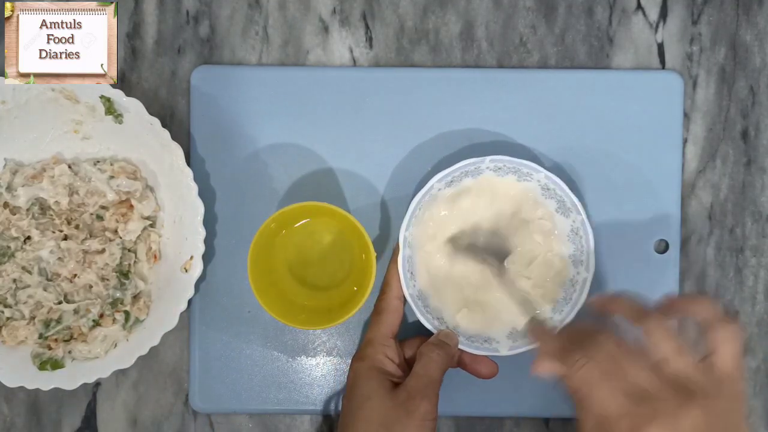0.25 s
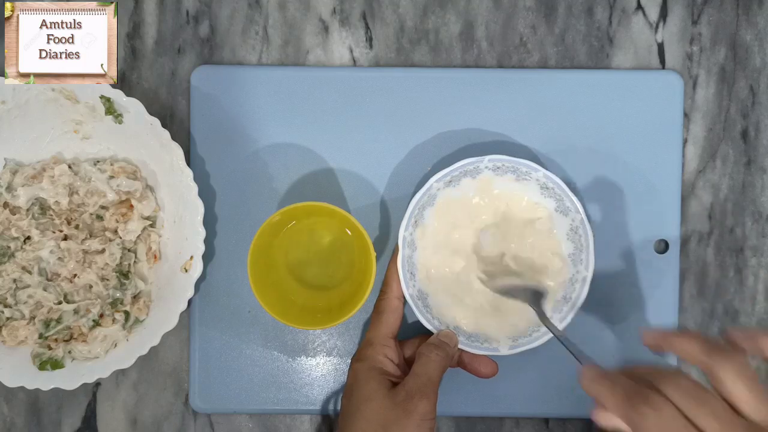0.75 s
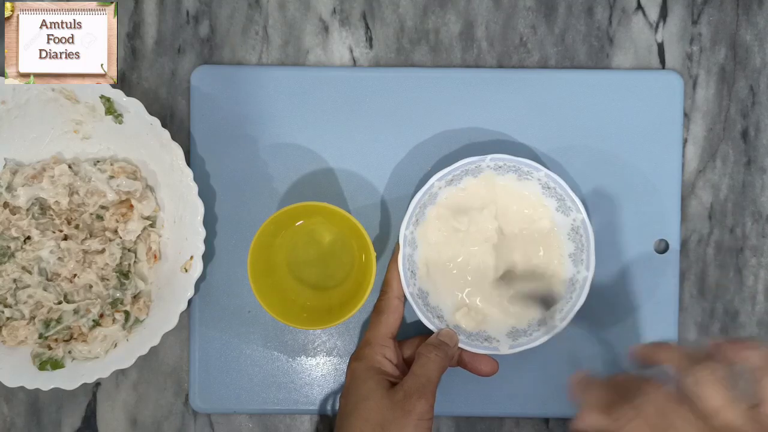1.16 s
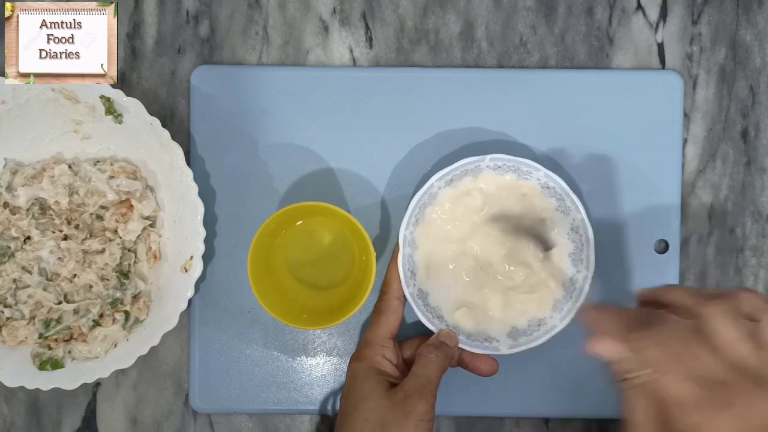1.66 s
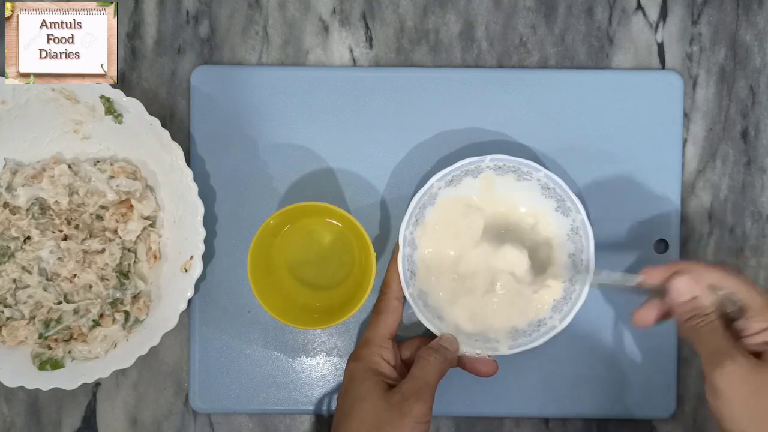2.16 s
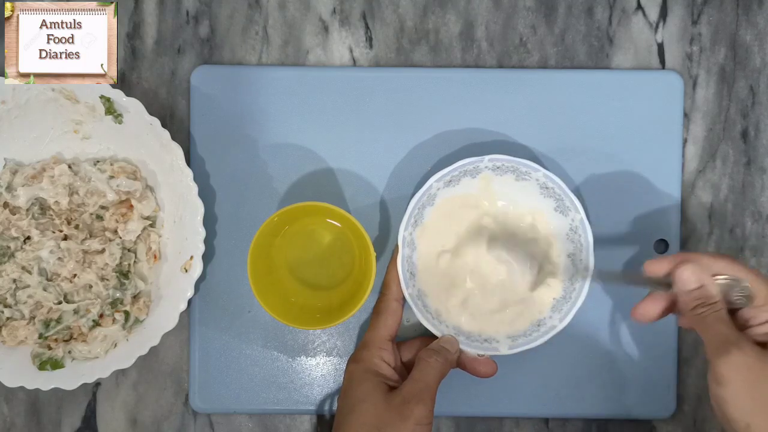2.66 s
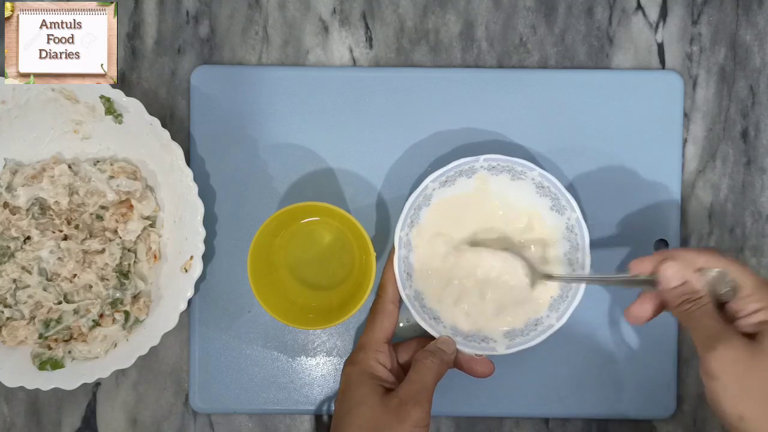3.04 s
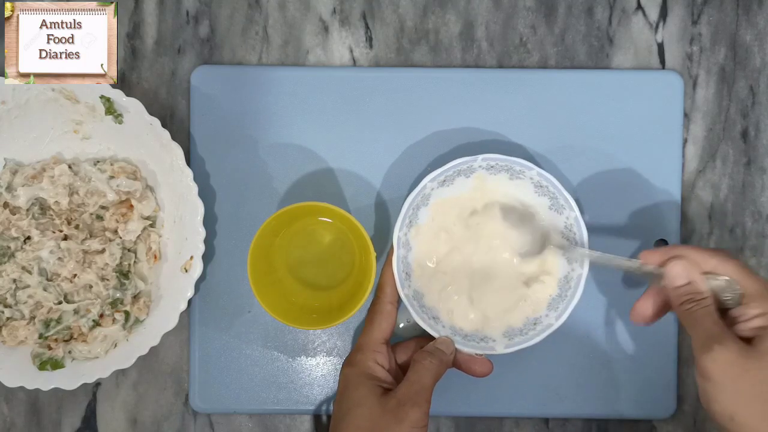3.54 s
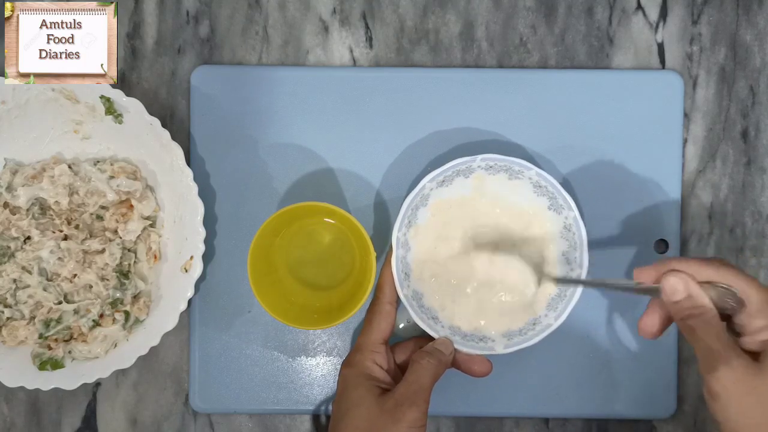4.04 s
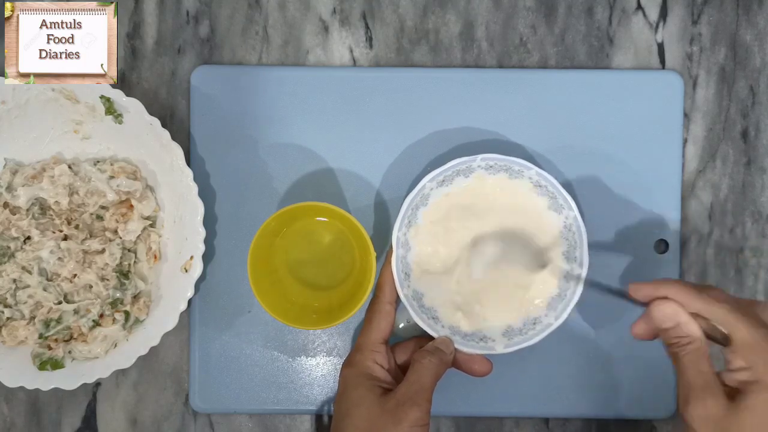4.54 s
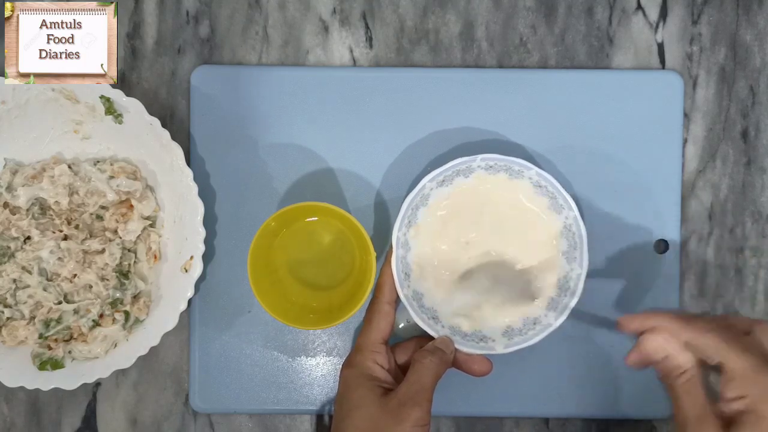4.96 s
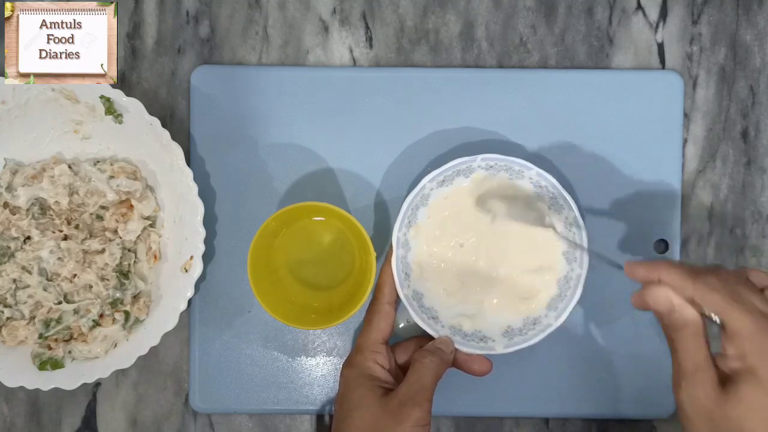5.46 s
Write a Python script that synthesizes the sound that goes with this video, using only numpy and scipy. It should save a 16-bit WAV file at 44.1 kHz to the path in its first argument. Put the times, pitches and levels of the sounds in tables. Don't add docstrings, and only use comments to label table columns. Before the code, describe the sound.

Close stereo phone pickup in a hard, tiled kitchen. A metal spoon stirs thick flour paste in a ceramic bowl, starting with faint taps and gritty scrapes, then irregular harder clacks dulled by the paste. The bowl rocks faintly on a plastic board. A distant horn sounds twice early on. Near the end, five bright rim clinks ring briefly, then one dull clack. A low fan hum continues throughout.

```python
import sys
import numpy as np
from scipy import signal
from scipy.fft import rfft, irfft
from scipy.io import wavfile
from scipy.ndimage import uniform_filter1d

SR = 44100
rng = np.random.default_rng(int(sys.argv[2]) if len(sys.argv) > 2 else 0)


def voltage_ratio(level):
    return 10 ** (np.asarray(level, float) / 20)


def store_wav(level_fs):
    pcm = np.round(np.clip(np.atleast_2d(level_fs), -1, 1) * 32767)
    wavfile.write(sys.argv[1], SR, pcm.T.astype(np.int16))


N = 250929

# time in seconds, peak level in dB,
# low clack in Hz, high clack in Hz, high clack level in dB.
STROKES = [(0.0541, -34, 1570, 2920, -10), (0.3566, -32.5, 1620, 2920, -10), (0.7235, -14, 2440, 4120, 0),
           (1.1229, -19.5, 1750, 3400, -2), (1.2775, -16.5, 1500, 3300, 3),
           (1.4429, -25.5, 1730, 2750, -8.5), (1.688, -21.5, 3020, 5300, -11),
           (2.296, -16.5, 1456, 3710, 2), (2.558, -25, 2440, 3140, -2), (2.749, -12, 2350, 3250, -17),
           (2.899, -20.5, 1780, 3400, -18.5), (2.9513, -8.5, 2610, 4260, -9.5),
           (3.1495, -10.5, 1880, 2710, -2.5), (3.302, -26.5, 2110, 4030, -35),
           (3.352, -22, 1840, 3930, -4.5), (3.508, -19.5, 2030, 3800, -15),
           (3.7071, -21, 2050, 3960, -12.5), (3.7543, -19.5, 4050, 2150, -8.5),
           (3.9183, -20, 2020, 3460, -15), (4.108, -13.5, 2060, 3970, -6), (4.1736, -19, 2300, 3800, -4),
           (4.688, -17, 1704, 2940, -6), (4.9047, -21, 2350, 4460, -6), (5.679, -12, 2830, 3110, 0.5)]
# time in seconds, peak level in dB, low clack in Hz, tick level in dB.
TAPS = [(0.148, -59, 1790, -22), (0.2942, -44.5, 2330, -38), (0.316, -44, 1630, -31),
        (0.515, -55, 1840, 15), (2.0034, -32, 2620, -18), (2.0434, -32.5, 1860, -40),
        (2.0802, -31.5, 2330, 15), (2.1845, -42.5, 2300, 23), (2.2802, -48, 2330, 10),
        (2.3502, -33, 1600, -22), (2.45, -36.5, 2050, 11), (2.681, -39, 1570, -3), (2.7008, -50, 1680, -25),
        (2.725, -48, 2080, -12), (2.9194, -38, 1790, 11), (3.101, -31, 1880, -45), (3.27, -28, 1910, 7),
        (3.3117, -33.5, 1770, 8), (3.475, -41, 2120, -1), (3.5557, -32.5, 1740, -20),
        (3.6838, -37, 1840, 31), (5.025, -34, 2470, 19), (5.0854, -15, 1600, -13),
        (5.5974, -43.5, 2790, 12)]
# time in seconds, peak level in dB.
RIM_CLACKS = [
    (4.377, -6),
    (4.6373, -6),
    (4.8636, -7),
    (5.0739, -9.5),
    (5.309, -8.5),
]
# time in seconds, strength in dB,
# then dB added to the middle, main and top mode families.
RINGS = [
    (0.7216, -41.5, 14, -8, -8),
    (4.377, -19, 3.5, 6.5, -3),
    (4.6367, -20, 0, -4.5, -14),
    (4.862, -19, -11, -15, -18),
    (4.906, -41, -11, -8, -18),
    (5.0737, -20, 5.5, 3.5, 2.5),
    (5.3094, -18, 0, 3, -2),
    (5.3841, -28, 4.5, 7.5, -5),
]
MODE_HZ = [1297, 1850, 2841, 2872, 3370, 4890, 4955, 7040, 7330, 7405, 7494, 7566, 8600, 10400, 10500,
           12680, 13730, 13850, 15250]
# level in dB, time to fade by 60 dB in seconds.
MODE_LEVEL_FADE = [(-4.5, 0.022), (0, 0.011), (-3, 0.06), (-3, 0.07), (2, .02), (8.5, 0.0091),
                   (-0.5, 0.076), (9, 0.012), (-9, 0.083), (-2.5, .06), (2, 0.11), (3, 0.064), (-6, .012),
                   (9, 0.022), (10, 0.031), (-4, 0.025), (4, 0.025), (4, .03), (-12, .03)]
MODE_FAMILY = [0, 0, 0, 0, 0, 0, 1, 0, 2, 2, 2, 2, 0, 3, 3, 3, 3, 3, 3]
# start in seconds, length in seconds, level in dB, wall resonance in Hz.
SCRAPES = [(-.05, 0.085, -58.5, 1650), (0.066, 0.14, -63, 1580), (0.28, .08, -54, 1700),
           (.82, 0.12, -72, 1870), (1.25, .12, -53.5, 1400), (1.46, 0.085, -55, 1780),
           (1.59, 0.1, -51, 1720), (1.695, 0.033, -61, 1840), (1.996, 0.16, -75, 1900),
           (2.34, 0.1, -70, 1700), (2.54, 0.082, -60, 2280), (2.685, 0.049, -72, 1860),
           (3.202, .1, -61, 2000), (3.58, 0.093, -78, 2000)]
# frequency in Hz, width in Hz, level in dB.
GLAZE = [(2330, 850, -0.5), (3620, 550, -9), (900, 170, -7)]
# time in seconds, peak level in dB, board note in Hz, thud level in dB.
KNOCKS = [(0.723, -40, 760, -52.5), (1.121, -39.5, 877, -52.5), (2.043, -39, 908, -47),
          (2.296, -42, 717, -56), (2.898, -41, 912, -57.5), (2.95, -40.5, 723, -49), (3.15, -48, 730, -50),
          (3.302, -37.5, 910, -64), (3.507, -45, 915, -61), (3.708, -41, 905, -59),
          (3.918, -25, 715, -53.5), (4.107, -42, 750, -49), (4.376, -42, 987, -54), (4.637, -40, 955, -44),
          (4.863, -36.5, 975, -45.5), (5.072, -58, 970, -46.5), (5.308, -54, 985, -49),
          (5.68, -50, 960, -42)]
# left delay in ms, right delay in ms, level in dB.
NEARBY = [(0.298, .14, -19), (1.152, 0.868, -20), (1.9, 1.9, 0.5)]
# frequency in Hz, left minus right in dB.
PORTS_DB = [(1000, -2), (2400, 2), (4400, -4.5), (8000, -2.5), (13000, -10.5)]
# frequency in Hz, level in dB.
SHEEN_DB = [(500, -3), (1500, 4), (4000, 0.12), (5800, -4.5), (7000, -1.5), (8500, -1), (9600, -10.5),
            (11800, -14.5), (14000, -6.5), (15400, -14), (16400, -40)]
# frequency in Hz, time to fade by 60 dB in seconds.
TILES_T60 = [(200, 0.66), (800, 0.41), (2500, 0.54), (6000, 0.5), (14000, 0.31)]
# frequency in Hz, level in dB.
TILES_DB = [(200, -4.5), (800, 7.5), (1600, -2), (2500, -3.5), (6000, -2), (14000, -3)]
# start in seconds, length in seconds, level in dB.
HONKS = [
    (.83, 0.3, -57.5),
    (1.179, 0.046, -56),
]
# frequency in Hz, width in Hz, level in dB.
HUM = [(50, 5.5, -78), (100.9, 28, -61), (125.7, 11.4, -62.5), (165.7, 27, -63.5), (254.7, 39, -64),
       (320.5, 41, -64.5), (380, 48, -67.5)]
# frequency in Hz, level in dB per Hz.
FLOOR = [(12, -45), (20, -6.5), (107, -5), (130, -1.5), (182, -4), (216, -17.5), (248, -12), (293, -22.5),
         (388, -13), (459, -15.5), (574, -16), (1090, -24), (6720, -38.5), (8890, -35.5), (16000, -40)]
# frequency in Hz, likeness from 0 to 1.
ALIKE = [(25, .7), (70, 1), (300, 0.83), (1000, 0.07), (3000, 0.13), (8000, 0)]

TICK_DB, TICK_AT_DB, TICK_PER_DB = -6, -12.5, 0.5
TICK_PER_HIGH_DB, LEAST_TICK_DB = 0.74, -25
TAP_HIGH_HZ, TAP_HIGH_DB, TAP_HIGH_PER_TICK = 3590, 1.5, 0.58
RIM_LOW_HZ, RIM_HIGH_HZ, RIM_HIGH_DB, RIM_TICK_DB = 2912, 7065, -6, -13.5
SPLASH_DB = -1
CUPPED_DB = -6
BOARD_T60_S = 0.076
SCRAPE_ATTACK_S, SCRAPE_FADE_DB_PER_S, WET_HISS_DB = 0.028, 200, -18
SLIPS_PER_S, GRIT_DB, JUDDER_DB = 1800, 3, 3.5
SHADE_DB, SHADE_PER_S = 2.5, 70
HORN_HZ, HORN_SAG_HZ_PER_S, HORN_EDGE_S = 411, 62, 0.051
MAINS_HZ, MAINS_DB, FLOOR_DB = 100.9, -57, -53


def along(table, hz):
    f, v = np.transpose(table)
    return np.interp(np.log(hz + 1), np.log(f + 1), v)


def shape(x, gain):
    n = x.shape[-1]
    return irfft(rfft(x) * gain(np.arange(n // 2 + 1) * SR / n), n)


def unit(x):
    return x / np.sqrt(np.mean(x ** 2))


def peak(x, hz, width_hz):
    return signal.lfilter(*signal.iirpeak(hz, hz / width_hz, fs=SR), x)


def glide(x, hz, width_hz):
    turn = np.exp(2j * np.pi * np.cumsum(hz) / SR)
    keep = np.exp(-np.pi * width_hz / SR)
    return 2 * np.real(signal.lfilter([1 - keep], [1, -keep], x / turn) * turn)


def mode(hz, t60, length_s, rise_s=0.00031, turn=0):
    t = np.arange(int(length_s * SR)) / SR
    return np.sin(2 * np.pi * (hz * t + turn)) * 10 ** (-3 * t / t60) * (1 - np.exp(-t / rise_s))


def add(out, s, x):
    i = int(s * SR)
    out[..., i:i + x.shape[-1]] += x[..., :N - i]


def walk(rate):
    k = int(SR / rate)
    held = np.repeat(rng.standard_normal(N // k + 1), k)
    return 1.11 * uniform_filter1d(uniform_filter1d(held, k), k)[:N]


def pair(n):
    mid, side = rng.standard_normal((2, n))
    like = lambda f: np.clip(along(ALIKE, f), 0, 1)
    mid = shape(mid, lambda f: np.sqrt(1 + like(f)))
    side = shape(side, lambda f: np.sqrt(1 - like(f)))
    return np.array([mid + side, mid - side]) / np.sqrt(2)


def all_blows():
    blows = []
    for s, db, low_hz, high_hz, high_db in STROKES:
        tick_db = TICK_DB + TICK_PER_DB * (db - TICK_AT_DB) + TICK_PER_HIGH_DB * (high_db + 10)
        blows.append((s, db, low_hz, high_hz, high_db, tick_db))
    for s, db, low_hz, tick_db in TAPS:
        blows.append((s, db, low_hz, TAP_HIGH_HZ, TAP_HIGH_DB + TAP_HIGH_PER_TICK * tick_db, tick_db))
    for s, db in RIM_CLACKS:
        blows.append((s, db, RIM_LOW_HZ, RIM_HIGH_HZ, RIM_HIGH_DB, RIM_TICK_DB))
    return blows


def clacks():
    out, n = np.zeros((2, N)), 1600
    t = np.arange(n) / SR
    pitched = voltage_ratio(np.array([[0], [CUPPED_DB]]))
    bright = signal.butter(2, 4500, "high", fs=SR, output="sos")
    for s, db, low_hz, high_hz, high_db, tick_db in all_blows():
        turn, wait = rng.random(2)
        g = rng.standard_normal((2, n))
        splash = peak(peak(g[0] * np.exp(-t / 0.0041), low_hz, 1920), low_hz, 2100)
        low = pitched * unit(mode(low_hz, 0.0093, n / SR, 0.00065)) + voltage_ratio(SPLASH_DB) * unit(splash)
        high_splash = unit(peak(g[1] * np.exp(-t / 0.0022), high_hz, 3000))
        high = pitched * unit(mode(high_hz, 0.009, n / SR, turn=turn)) + voltage_ratio(1.0) * high_splash
        tick_fade = np.exp(-t / 0.00055) + voltage_ratio(-29) * np.exp(-t / 0.005)
        tick = unit(signal.sosfilt(bright, g[0, ::-1] * tick_fade))
        body = unit(peak(g[1, ::-1] * np.exp(-t / 0.0052), 1090, 910))
        blow = low + voltage_ratio(high_db + 6) * high + voltage_ratio(-20) * body
        blow = blow + (voltage_ratio(tick_db + 8.5) + voltage_ratio(LEAST_TICK_DB)) * tick
        blow = voltage_ratio(db - 18.5) * unit(blow)
        add(out, s - 0.0002, blow)
        add(out, s + 0.002 + 0.001 * wait, voltage_ratio(-12.0) * blow)
    return out


def rings():
    families, thump = np.zeros((4, N)), np.zeros(N)
    for s, db, *family_db in RINGS:
        for hz, (mode_db, t60), family in zip(MODE_HZ, MODE_LEVEL_FADE, MODE_FAMILY):
            strength, shift, turn = rng.random(3)
            gain = voltage_ratio(db + [0, *family_db][family] + mode_db - 5.0 + 1.7 * (strength - 1.5))
            add(families[family], s, gain * mode(hz * (1 + (shift - 0.5) / 600), t60, 0.3, turn=turn))
        add(thump, s, voltage_ratio(db - 20) * mode(45, 0.073, 0.1, 0.003))
    return thump + sum(family * voltage_ratio(4.5 * walk(130)) for family in families)


def drag():
    t = np.arange(N) / SR
    press = 0
    for start, length, db, _ in SCRAPES:
        fade_db = SCRAPE_FADE_DB_PER_S * np.clip(t - start - length, 0, None)
        press = press + voltage_ratio(db - fade_db) * np.clip((t - start) / SCRAPE_ATTACK_S, 0, 1)
    grain_db = GRIT_DB * rng.exponential(size=N) + JUDDER_DB * walk(40.4)
    slips = (rng.random(N) < SLIPS_PER_S / SR) * rng.standard_normal(N) * voltage_ratio(grain_db)
    start, length, _, hz = np.transpose(SCRAPES)
    moving = glide(slips, np.interp(t, start + length / 2, hz), 260.0)
    steady = sum(voltage_ratio(db) * peak(slips, f, width) for f, width, db in GLAZE)
    wall = unit(voltage_ratio(5.5) * moving + steady)
    hiss = unit(peak(peak(rng.standard_normal(N), 9000, 9000), 11000, 9000)) * voltage_ratio(2.0 * walk(20))
    return voltage_ratio(-1.0) * press * (wall + voltage_ratio(WET_HISS_DB) * hiss)


def knocks():
    out = np.zeros(N)
    for s, db, hz, thud_db in KNOCKS:
        board = mode(hz, BOARD_T60_S, 0.2, 0.0047) + voltage_ratio(-12) * mode(hz * 1.2, BOARD_T60_S, 0.2, 0.002)
        thud = mode(255.2, 0.11, 0.2, 0.0044) + voltage_ratio(1.5) * mode(312.3, 0.072, 0.2, 0.0037)
        add(out, s, voltage_ratio(db - 2.5) * board)
        add(out, s, voltage_ratio(thud_db + 11.0) * thud)
    return out


def phone_ports(x):
    left_ms, right_ms, db = np.transpose(NEARBY)
    late = lambda f, ms: np.exp(-2j * np.pi * np.outer(f, ms) / 1000) @ voltage_ratio(db)
    treble = lambda f: 1j * f / (2500 + 1j * f)
    bounces = lambda f: 1 + treble(f) * np.array([late(f, left_ms), -late(f, right_ms)])
    return shape(x, lambda f: bounces(f) * voltage_ratio(np.outer([0.5, -0.5], along(PORTS_DB, f))))


def tiles(blows, ring):
    n = 32768
    t, noise = np.arange(n) / SR, pair(n)
    echo = 0
    for hz in 125 * 2 ** np.arange(0, 7.5, 0.5):
        band = shape(noise, lambda f: np.cos(np.pi * np.clip(np.log2((f + 1) / hz), -0.5, 0.5)) ** 2)
        t60 = along(TILES_T60, hz)
        echo = echo + band * 10 ** (-3 * t / t60) * voltage_ratio(along(TILES_DB, hz)) / np.sqrt(t60 * SR / 14)
    echo = echo * np.clip((t - 0.004) / 0.0023, 0, 1)
    blows, ring = (signal.oaconvolve(x[None], echo, axes=1)[:, :N] for x in (blows, ring))
    return blows + voltage_ratio(SHADE_DB * walk(SHADE_PER_S)) * ring


def horn():
    t = np.arange(N) / SR
    gate = 0
    for s, length, db in HONKS:
        edge = np.minimum(t - s, s + length - t) / HORN_EDGE_S
        gate = gate + voltage_ratio(db) * np.clip(edge + 0.5, 0, 1)
    hz = HORN_HZ - HORN_SAG_HZ_PER_S * (t - HONKS[0][0])
    return np.sin(2 * np.pi * np.cumsum(hz) / SR) * voltage_ratio(3.0) * gate


def fan():
    motor = pair(N)
    hum = sum(unit(peak(peak(motor, f, w), f, w)) * voltage_ratio(db + 1.93 * walk(3.99)) for f, w, db in HUM)
    t = np.arange(N) / SR
    mains = np.sin(2 * np.pi * MAINS_HZ * t + 0.5 * walk(5.1))
    return hum + mains * voltage_ratio(MAINS_DB + 3.0 + 1.4 * walk(11))


def noise_floor():
    air = unit(shape(pair(N), lambda f: voltage_ratio(along(FLOOR, f))))
    return air * voltage_ratio(FLOOR_DB - 4 + 0.62 * walk(3.13))


def scene():
    bell = rings()
    dull, thrown = clacks() + knocks() + voltage_ratio(-1) * drag()
    spoon = phone_ports(bell + dull) + tiles(thrown, voltage_ratio(6.0) * bell)
    spoon = shape(spoon, lambda f: voltage_ratio(along(SHEEN_DB, f)))
    return spoon + noise_floor() + fan() + horn()


def top_cut(x):
    return signal.sosfilt(signal.butter(12, 16680, fs=SR, output="sos"), x)


def record(dry):
    return top_cut(dry)


dry = scene()
out = record(dry)
store_wav(out)
```